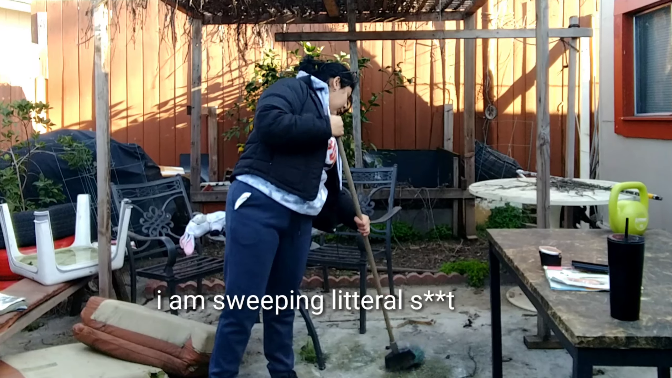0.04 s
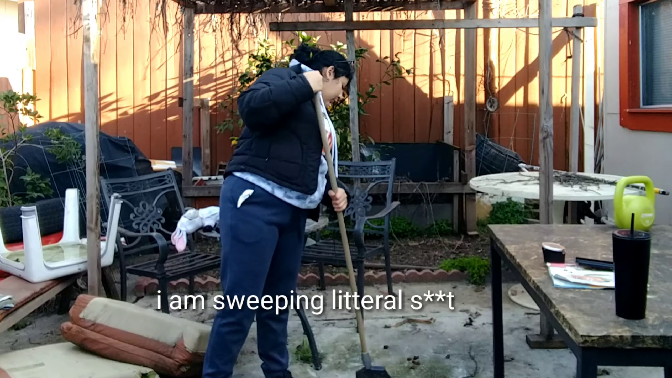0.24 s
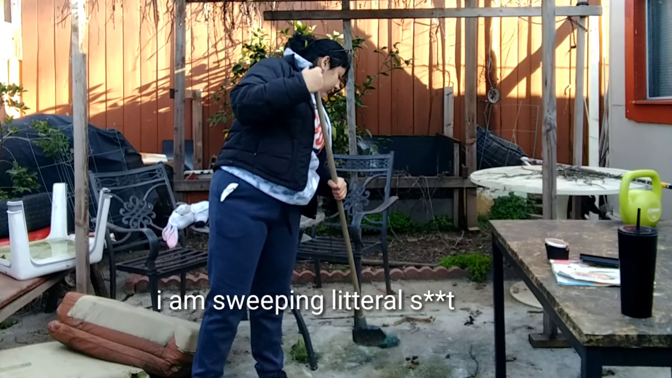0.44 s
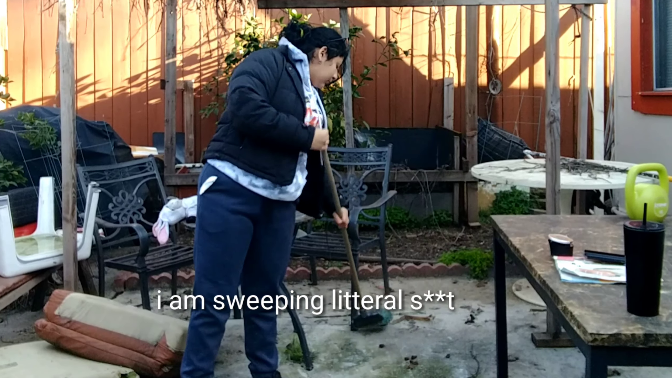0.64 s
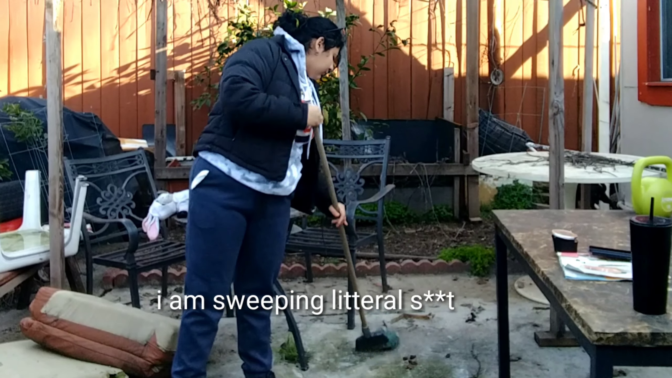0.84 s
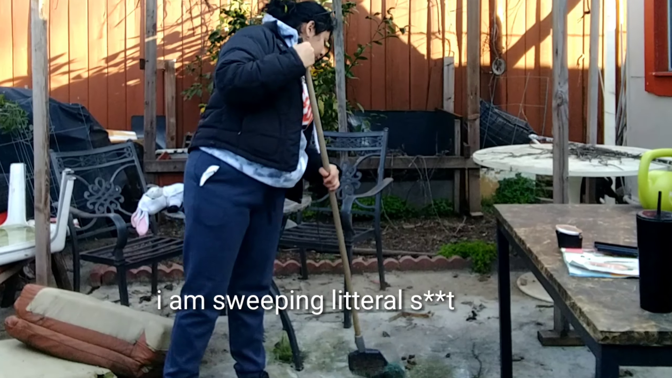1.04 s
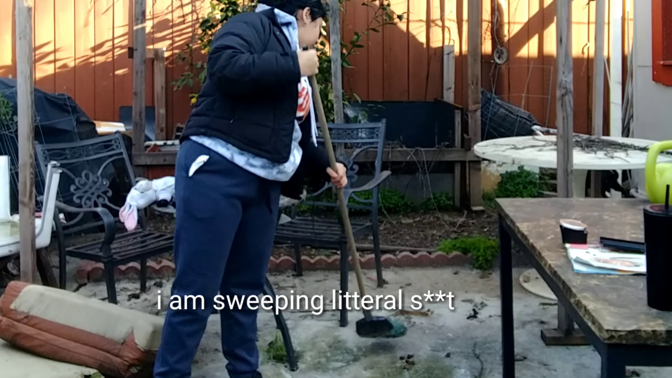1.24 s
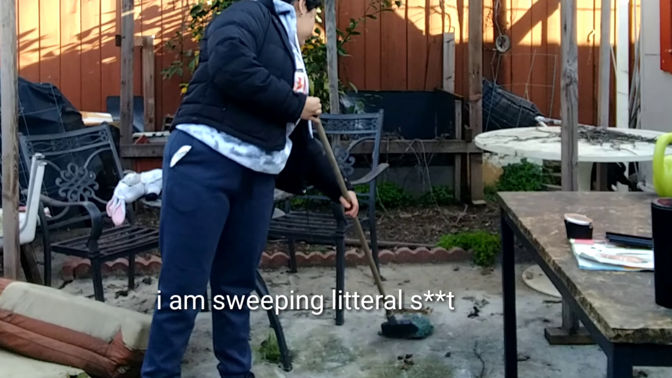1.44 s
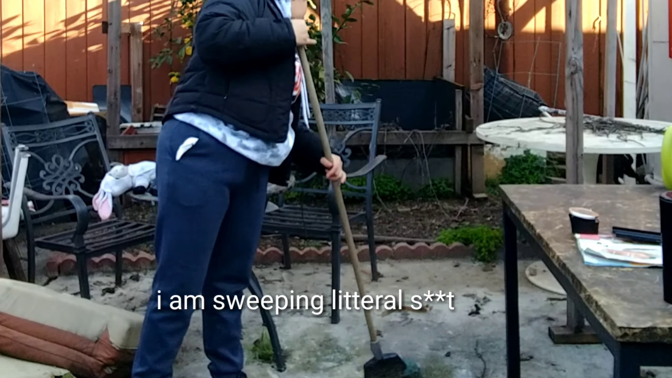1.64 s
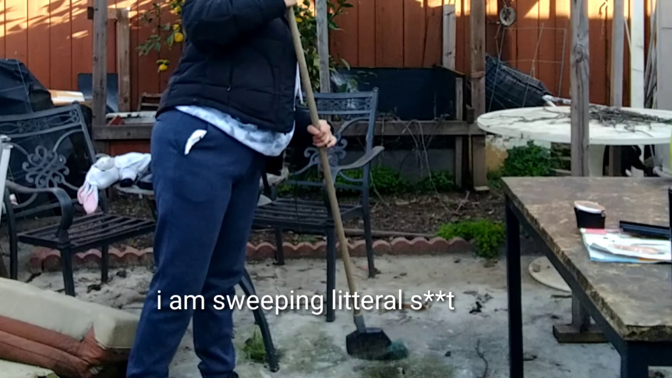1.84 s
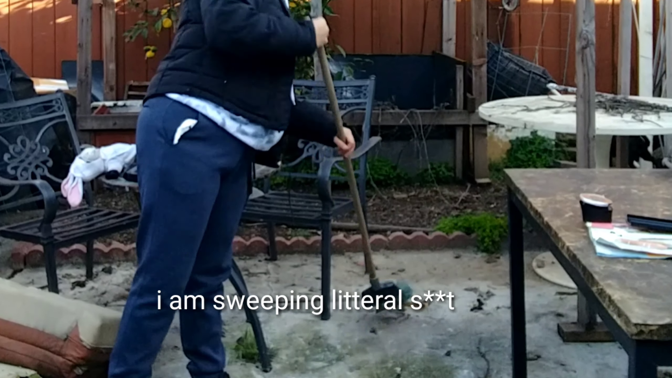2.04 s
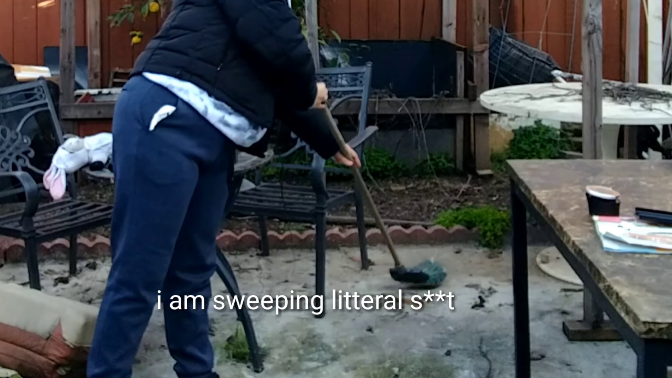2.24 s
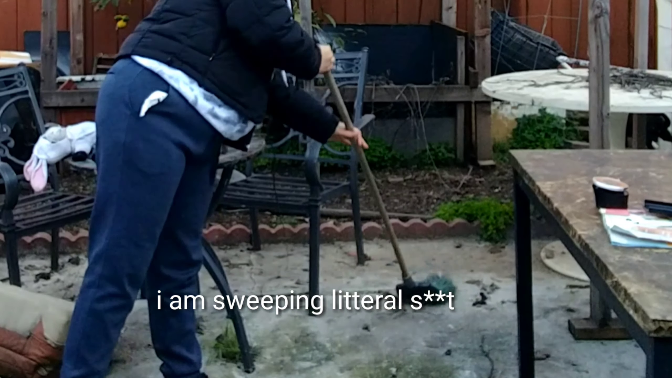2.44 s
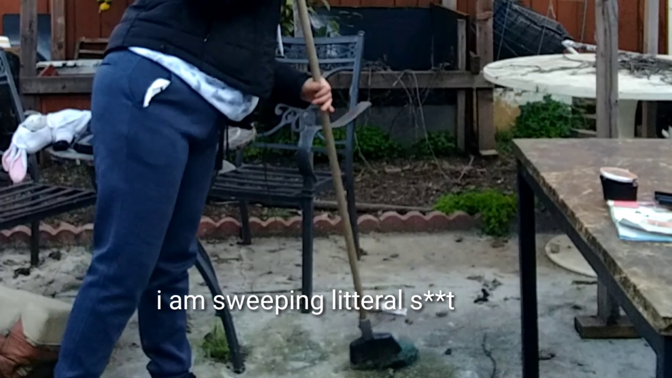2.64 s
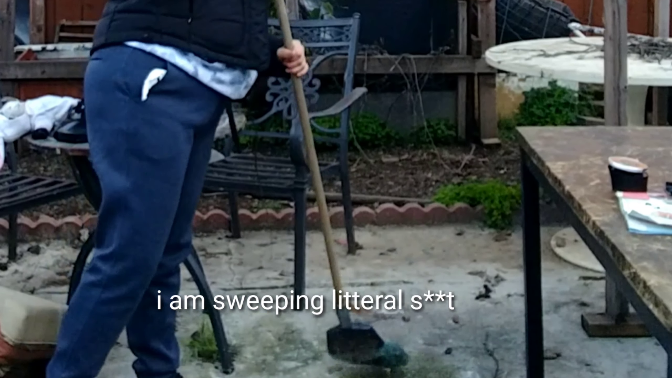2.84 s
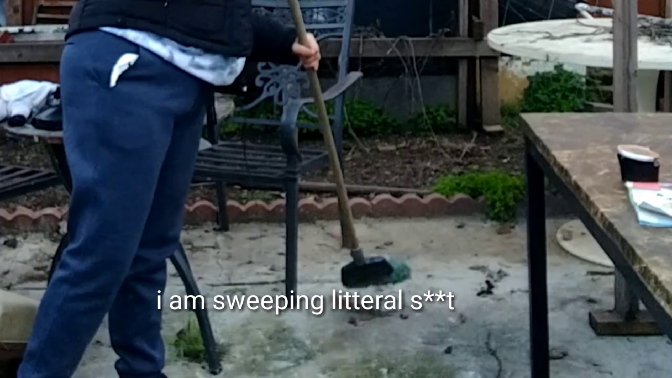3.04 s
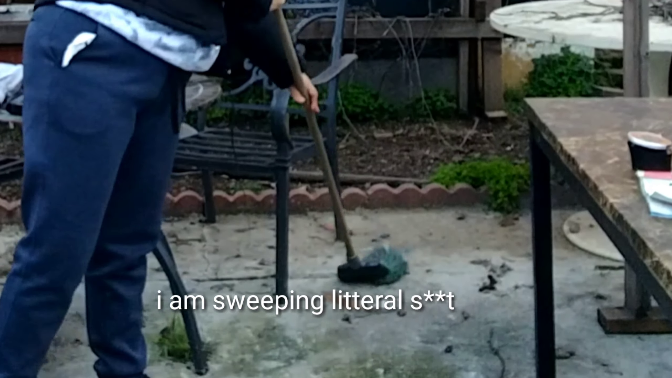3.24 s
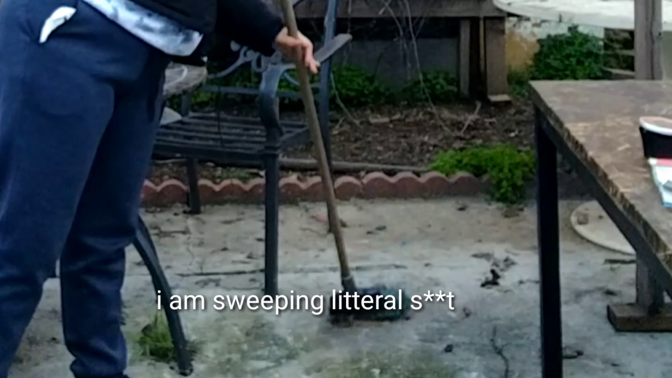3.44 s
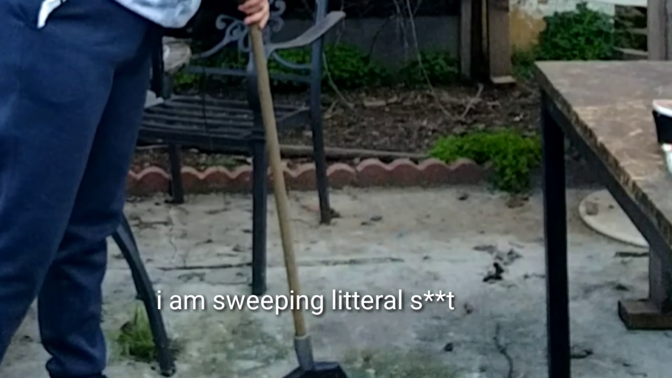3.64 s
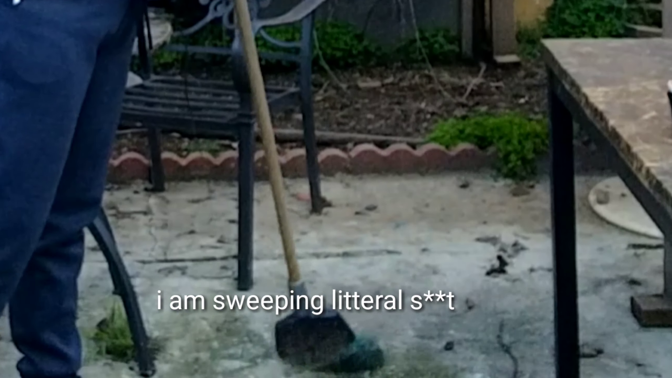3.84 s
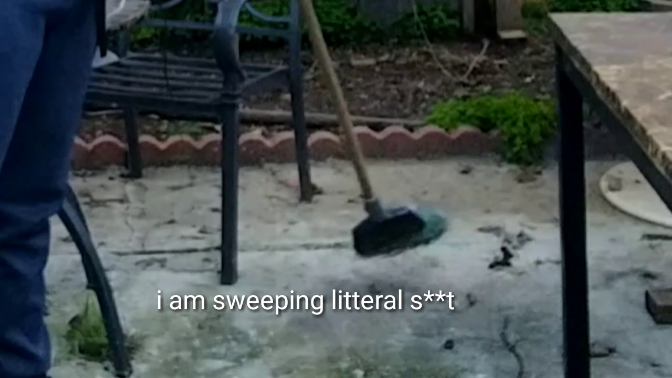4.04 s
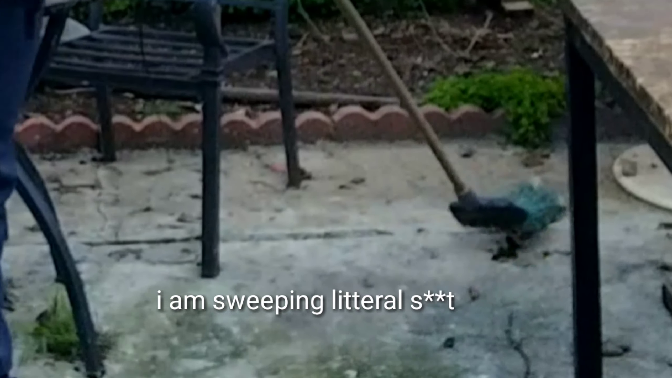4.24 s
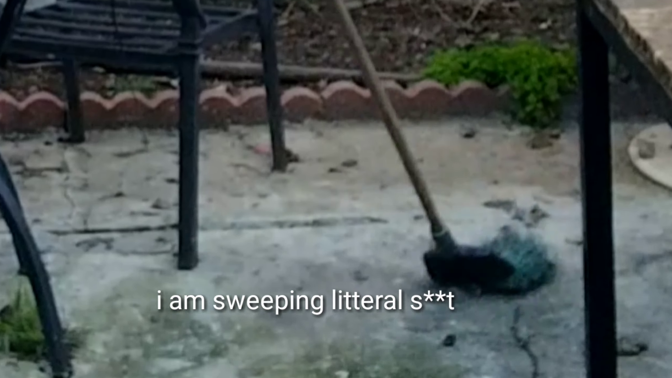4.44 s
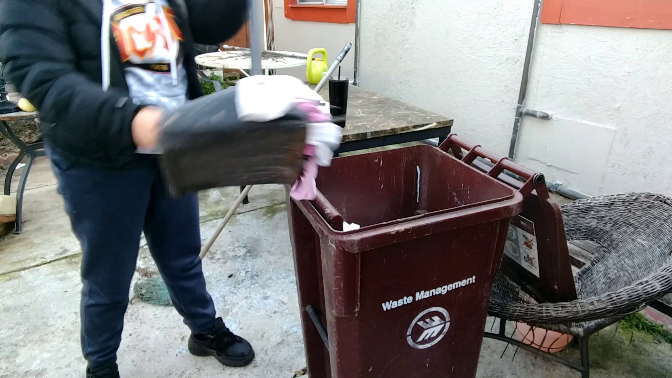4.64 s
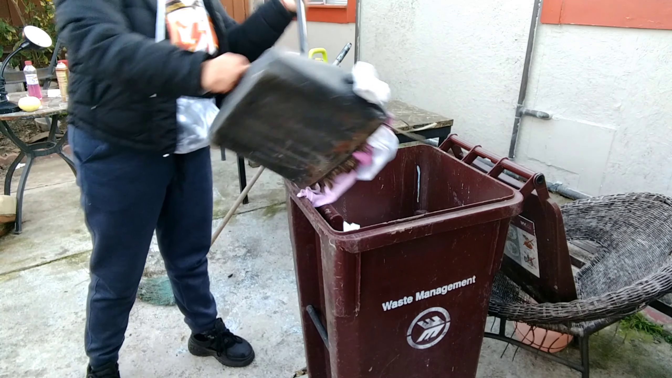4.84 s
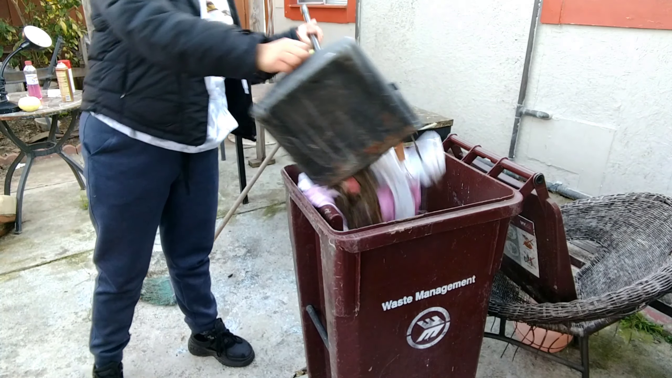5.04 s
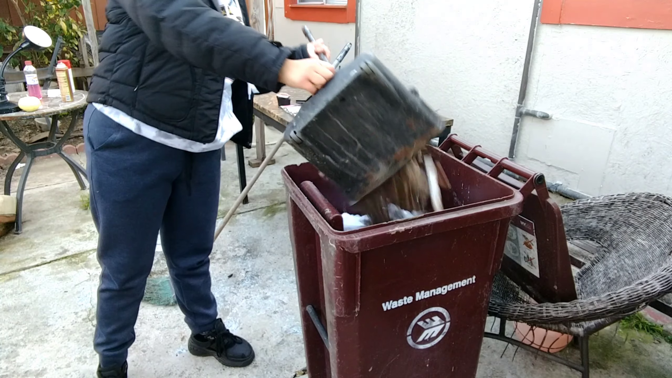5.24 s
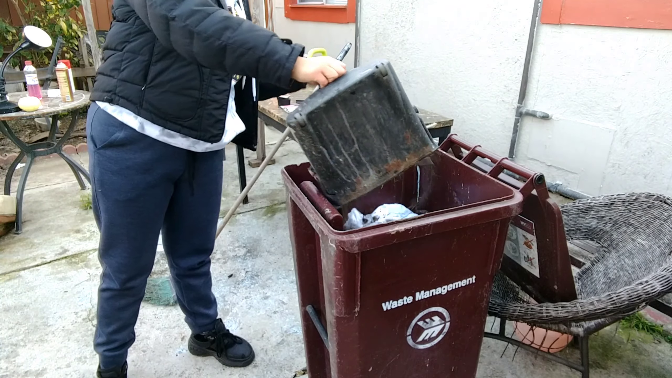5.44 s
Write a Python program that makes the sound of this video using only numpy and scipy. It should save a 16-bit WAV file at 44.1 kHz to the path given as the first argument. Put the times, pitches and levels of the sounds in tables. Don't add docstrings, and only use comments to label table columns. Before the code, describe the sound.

Dry, raspy bristle sweeps on gritty concrete outdoors with distant low rumble, then a sudden cut to rubbish sliding and clattering into a bin.

```python
import sys
import numpy as np
from scipy import signal
from scipy.fft import rfft, irfft, next_fast_len
from scipy.io import wavfile
from scipy.ndimage import uniform_filter1d

SR = 44100
rng = np.random.default_rng(int(sys.argv[2]) if len(sys.argv) > 2 else 0)


def how_loud(loudness_db):
    steps = np.asarray(loudness_db, float) / 20
    return 10 ** steps


def file_out(sig):
    cols = np.atleast_2d(sig).T
    lim = np.clip(cols, -1, 1)
    pcm = np.round(lim * 32767).astype(np.int16)
    wavfile.write(sys.argv[1], SR, pcm)


N = 242882
SIZE = next_fast_len(N + 4096)
HZ, T = np.fft.rfftfreq(SIZE, 1 / SR), np.arange(N) / SR
CUT_S, CUT_DIP_S, CUT_DIP_DB = 4.825, .016, -14

# [f/Hz, level/dB per Hz]
YARD = [(45, -6.5), (65, -4), (100, -4), (160, -7.5), (250, -12), (350, -19), (600, -25), (1000, -30),
        (1600, -65), (2300, -31.5), (3200, -49), (6000, -58), (9000, -51), (15000, -46.5)]
PATIO_DB, ALLEY_DB = -50.5, -52
WHINE_HZ, WHINE_DB = 6100, -71
# [t/s, shaft line level/dB, second line level/dB]
ENGINE = [(0.0, -60, -60), (0.44, -54, -55), (0.87, -80, -50.5), (1.11, -57, -75), (1.5, -62, -65.5),
          (1.96, -52, -47.5), (2.49, -42, -46.5), (2.75, -50.5, -51.5), (2.81, -42.5, -57.5),
          (3.17, -47, -46), (3.7, -41, -55), (3.88, -51, -48), (3.92, -43, -53), (4.02, -50, -46.5),
          (4.42, -43.5, -45), (4.52, -40.5, -48), (4.68, -59, -57), (4.8, -55, -63)]
# [t/s, f/Hz]
SHAFT = [(0, 76.8), (1.5, 75), (2.1, 80.47), (3.6, 81.7), (5.51, 81.6)]
# [t/s, level/dB]
EXHAUST = [(0, -50.5), (.9, -49), (1.06, -43), (1.64, -46.5), (1.75, -51), (2.58, -48), (2.66, -41),
           (2.9, -40.5), (3.05, -45), (3.3, -41.5), (3.5, -45.5), (4.0, -46), (4.08, -52.5), (4.53, -40),
           (4.66, -57), (4.78, -45.5), (4.85, -68), (5.5, -46.5)]
# [f/Hz, half width/Hz, level/dB]
PIPE = [(177.6, 12, 1.5), (199.5, 6.5, -2)]
# [t/s, peak level/dB]
THROBS = [
    (1.032, -31.5),
    (1.094, -37.5),
    (1.235, -28),
    (1.362, -37.5),
    (1.49, -35.5),
    (1.545, -35),
]
THROB_HZ, THROB_S = 196.3, 0.017
# [t/s, level/dB]
DRONE = [(2.6, -79), (3.0, -53.5), (3.3, -51), (3.9, -56), (4.1, -49), (4.3, -63), (4.6, -72), (4.8, -73)]
DRONE_HZ, DRONE_WIDTH_HZ = 265, 25
# [f/Hz, wander/Hz]
FAN = [(301.5, 2.44), (404.5, 0.45), (503, 1.15)]
# [t/s, level/dB of each of its three lines]
FAN_LEVEL = [(0.0, -86, -75, -88), (1.64, -75, -56, -60), (2.0, -61, -67, -67), (2.5, -62, -57.5, -59.5),
             (2.8, -62, -70, -73), (2.95, -63.5, -58, -57), (3.2, -53.5, -57.5, -60.5),
             (3.42, -56, -49.5, -63), (3.5, -48, -58, -58), (3.7, -62, -61, -58.5),
             (3.78, -56.5, -48, -61.5), (4.08, -63.5, -51.5, -58), (4.15, -60, -56.5, -68),
             (4.35, -55, -52, -52.5), (4.55, -58, -56.5, -55.5), (4.62, -73, -67, -61),
             (4.82, -75.5, -65, -73)]
# [t/s, f/Hz, level/dB]
RUN_DOWN = [(4.46, 497, -85), (4.52, 492, -55.5), (4.6, 465, -60.5), (4.75, 421, -55.5), (4.81, 410, -61)]

# [t/s, peak level/dB, length/s, brightness/dB per octave, main wall pitch f/Hz]
LUMPS = [(5.1137, -22, 0.018, 7, 431), (5.118, -24.5, 0.0056, 11, 460), (5.129, -24, 0.016, 1.5, 431),
         (5.141, -26.5, 0.01, -7.5, 408), (5.172, -28.5, 0.07, -5, 450), (5.2136, -13, 0.0012, -1, 430),
         (5.222, -26, 0.013, -4, 431), (5.246, -27, 0.016, -4, 448), (5.258, -25.5, 0.0047, -6, 446),
         (5.265, -19.5, 0.015, 3, 433), (5.311, -26, 0.011, 0, 428), (5.335, -18, 0.024, -1, 450),
         (5.343, -22.5, 0.0025, 6, 443), (5.355, -25.5, 0.0041, -4, 440), (5.37, -24, 0.0094, 7, 431),
         (5.387, -27, .006, 6, 435), (5.393, -32, 0.0096, 12, 504), (5.405, -19, 0.016, 1, 439),
         (5.422, -26.5, 0.014, 13, 431), (5.439, -23, 0.0078, -15, 431), (5.472, -24.5, 0.022, 12, 444)]
# [f/Hz, level/dB, t60/s]
BIN = [(229, -5.5, 0.077), (258, -11.5, 0.13), (431, 8.5, 0.058), (560, 1.5, 0.051), (672, -5, 0.064),
       (925, -2, 0.025), (1085, -9.5, 0.031), (1330, -8.5, 0.027)]
# [t/s, peak level/dB, f/Hz, t60/s]
THUDS = [(5.1177, -28, 428, 0.12), (5.128, -25.5, 700, 0.027), (5.136, -30.5, 953, 0.056),
         (5.165, -33, 706, .04), (5.2136, -19, 810, 0.019), (5.222, -30, 240, 0.088),
         (5.2464, -22.5, 438, .12), (5.264, -20, 439, 0.093), (5.313, -25.5, 447, .1),
         (5.333, -22, 440, .08), (5.342, -21, 451, 0.068), (5.34, -24, 1404, .03), (5.352, -31, 700, 0.07),
         (5.3565, -19.5, 276, .06), (5.372, -25, 960, 0.028), (5.393, -23, 810, 0.032),
         (5.402, -24.5, 1442, 0.06), (5.405, -24.5, 486, .05), (5.405, -23, 1000, .015),
         (5.43, -30, 794, .04), (5.476, -28, 972, .05)]
THUD_RISE_S = 0.0013
BIN_LAG, BIN_RIGHT_DB = 5, -1.5

SAND = [(0.425, -41), (0.503, -33), (2.022, -39), (2.5925, -16), (3.381, -32.5), (3.9743, -48),
        (4.009, -33), (4.396, -31.5), (5.146, -24.5)]
DUST = [(0.444, -44), (0.5467, -46), (1.8816, -57), (2.987, -43), (3.0044, -41), (3.1028, -39.5),
        (3.119, -40), (3.2, -51), (4.0582, -44)]
STEMS = [(0.791, -39.5), (1.1917, -44.5), (1.8637, -45.5), (1.908, -46), (2.022, -37.5), (2.1161, -51),
         (2.2545, -44.5), (2.4379, -53), (2.546, -31), (2.5564, -28.5), (2.566, -32), (2.577, -26),
         (2.598, -29), (3.518, -20.5), (3.557, -24), (3.7028, -21.5), (3.705, -27), (3.721, -38),
         (4.944, -34), (5.258, -23.5), (5.267, -19.5), (5.41, -19), (5.418, -21.5)]
CHIPS = [(2.6067, -18.5), (3.3358, -32), (3.4915, -42), (3.5014, -35), (3.534, -17.5), (3.546, -18),
         (3.8134, -29.5), (3.871, -28), (3.975, -35), (5.3501, -17.5), (5.4767, -17)]
PEBBLES = [
    (3.51, -23),
    (4.044, -39.5),
    (4.146, -32.5),
    (5.2135, -19.5),
]
SNAPS = [
    (0.42, -47.5),
    (4.143, -28.5),
    (4.162, -37),
]
# [centre f/Hz, width/Hz, t60/s]
KINDS = [
    (11100, 5000, 0.025),
    (13100, 2800, 0.098),
    (5660, 2100, 0.06),
    (5560, 4200, 0.023),
    (1780, 2700, 0.2),
    (1500, 5300, 0.0028),
]

# [t/s, peak level/dB, f/Hz]
KNOCKS = [
    (3.497, -40, 658),
    (4.54, -46.5, 672),
    (4.555, -40, 640),
    (4.56, -52, 596),
]
KNOCK_T60 = 0.21
# [arrival t/s, hold/s, pressure level/dB, rise/s, fall/s; rise and fall span SPAN_DB]
STROKES = [(0.097, 0.013, -44, 0.28, 0.48), (0.225, 0.023, -40.5, 0.23, 0.0856),
           (0.794, .03, -60.5, 0.021, 2.5), (0.927, 0.11, -41.5, 0.24, 0.1),
           (1.499, 0.012, -42, 0.062, 0.1), (1.659, 0.012, -37, 0.17, 0.26),
           (1.885, 0.0057, -58.5, 0.078, 0), (2.016, 0.0043, -61, 0.013, -1),
           (2.27, .01, -53.5, 0.46, 0.36), (2.459, 0.034, -47, 0.045, 0.52),
           (2.554, 0.023, -39.5, 0.081, 0.15), (2.6, 0.0083, -34.5, 0.031, 0.16),
           (2.702, .11, -42, 0.27, 0), (2.829, 0.01, -47, 0.28, 0.1), (3.242, 0.17, -53, 0.29, -1.5),
           (3.499, 0.012, -36, 0.041, 0.19), (3.539, 0.0032, -32, 0.062, 0.08),
           (3.596, .12, -37, 0.14, 0.25), (3.879, 0.0039, -47, 0.025, 0.27), (4.16, 0.19, -55.5, 0.2, 0),
           (4.402, 0.044, -48, 0.008, 0), (4.478, .03, -46, 0.09, -3.5), (4.561, 0.045, -37.5, 0.12, 0.2),
           (4.675, 0.055, -42.5, 0.17, -1.5)]
POUR = [
    (4.87, 0.17, -51, 0.19, .3),
    (5.09, 0.0062, -46, 0.07, 0.0065),
    (5.152, 0.021, -48, 0.069, .2),
    (5.226, 0.074, -37, 0.047, 0.9),
    (5.39, 0.018, -32.5, 0.46, 0.14),
    (5.474, 0.0038, -32.5, 0.015, 0.08),
]
REST_DB, SPAN_DB = -68.5, 23.5
SWEEP_END_S = 4.801
# [t/s, block level/dB, bristle ring level/dB, fizz level/dB; relative to the pressure]
GRIP = [(0.0, -1.5, -8.5, -2.5), (0.6, 2, -2.5, -3), (1.13, 0.5, -18, -6), (1.44, -1.5, -18.5, -4.5),
        (1.95, -0.5, -14, -5), (2.44, -1, -5.5, -4.5), (2.545, -8, -6, -7.5), (2.625, -1.5, -8, -2),
        (2.95, 1.5, -5.5, -6), (3.46, -3.5, -7.5, -2.5), (3.8, -2.5, -20, -8.5), (4.39, -1.5, -5, 3),
        (4.51, -4.5, -8.5, -3.5), (4.826, 10, -16, -9), (4.98, 8.5, -7, -10), (5.2, 3.5, -4.5, -2),
        (5.33, 6.5, -3.5, -5.5)]
GRIP_S = 0.067
USUAL_DB = -45
BLOCK_LEAN, RING_LEAN, FIZZ_LEAN, LITTER_LEAN = -0.026, 0.03, -0.1, -0.24
# [f/Hz, level/dB per Hz]
BROOM = [(350, -3), (600, -4), (1000, -2), (1600, -1), (2300, -6), (3200, -7), (4500, -4), (5600, 0),
         (6600, -3), (8000, -5), (9000, -6), (10500, -4), (13000, -8), (15300, -13)]
# [f/Hz, level/dB per Hz]
LITTER = [(350, -3), (600, -1), (1000, -4), (1600, -8.5), (2300, -4), (3200, 12.5), (4500, -9.5),
          (5600, -6), (6600, -8), (8000, -9.5), (9000, -14), (10500, -11), (13000, -16), (15300, -24)]
ZONES_HZ = [2100, 4800, 6400, 8800]
# [f/Hz, width/Hz, level/dB]
HEAD_RING = (1600, 2.6, 0.68)
PATCH_DB = 1.5

# [f/Hz, share from 0 to 1]
SAME = [(60, 0.95), (190, 0.95), (250, 0.79), (600, 0.77), (1200, 0.068), (2000, 0.1), (16000, 0.15)]
# [f/Hz, level/dB]
NEAR_TILT = [(60, 25), (1500, 2.5), (4500, -0.5), (5600, 14), (8000, 4), (10500, 8), (15000, 10)]
# [f/Hz, level/dB]
FAR_TILT = [(60, -0.5), (600, 3), (3000, -10), (6000, -8), (9000, -33.5), (12000, 0), (15000, 10)]
PORT_LAG_S = .0001
# [f/Hz, share from 0 to 1]
CROSS = [(60, .9), (2000, .86), (2250, .8), (2500, .62), (3300, .93), (4500, .93), (5500, .52), (6600, .58),
         (7700, .3), (8800, .2), (10500, 0)]
CROSS_LAG = 20
CROSSING = np.clip(np.interp(HZ, *np.transpose(CROSS)), 0, 1) * np.exp(-2j * np.pi * HZ * CROSS_LAG / SR)

BANDS = [0, 8, 16, 24, 32, 40, 48, 56, 64, 72, 80, 88, 96, 108, 120, 132, 144, 160, 176, 196, 216, 240, 264, 292, 320] + list(range(352, 1025, 32))
# [f/Hz, level/dB of the stronger channel over the step]
COARSE = [(200, 24), (600, 16), (1000, 8), (1500, 4), (2000, 2), (3000, 1.5), (9000, 1), (15000, 2)]
CLICK_FINE_DB = 10
CLICK_S, CLICK_KEEP_DB = .014, -30
WEAK_DB, WEAK_SIDE_DB, WEAK_SWING_DB, QUIET_LEAN = -8.7, -12.5, 1.7, .15
FRAME_SWING_DB = 1.2
TOP_HZ, TOP_JITTER_HZ, TOP_OPEN_HZ = 15380, 120, 350


def evened(x):
    return x / np.sqrt(np.mean(x ** 2) + 1e-20)


def read(points, hz=HZ):
    f, value = np.transpose(points)
    return np.interp(np.log(hz + 1), np.log(f + 1), value)


def curves(rows):
    s, *columns = np.transpose(rows)
    return [np.interp(T, s, c) for c in columns]


def coloured(x, gain):
    return irfft(rfft(x, SIZE) * gain, SIZE)[..., :N]


def resonate(x, hz, width):
    turn = np.exp(2j * np.pi * np.cumsum(hz * np.ones(len(x))) / SR)
    r = np.exp(-np.pi * width / SR)
    return 2 * (turn * signal.lfilter([1 - r], [1, -r], x / turn)).real


def at_ports(pair, tilt, gain=1, band_hz=None):
    a, b = rfft(pair, SIZE) * gain
    same, half = np.clip(read(SAME), 0, 1), how_loud(read(tilt) / 2)
    late = np.exp(-2j * np.pi * HZ * PORT_LAG_S)
    right = same * a * late + np.sqrt(1 - same ** 2) * b
    ports = np.array([a * half, right / half])
    if band_hz:
        inside = (HZ > band_hz[0]) & (HZ < band_hz[1])
        band = (ports.mean(0) * (1 - CROSSING))[inside]
        ports /= np.sqrt(2 * np.sum(abs(band) ** 2) / (SIZE * N))
    return irfft(ports, SIZE)[:, :N]


def far(x, band_hz=None):
    return at_ports([x, np.roll(x, 300)], FAR_TILT, 1, band_hz)


def yard():
    s = np.arange(600) / 100
    waves = [np.sin(2 * np.pi * (f * s + rng.random())) / np.sqrt(f) for f in np.geomspace(.3, 8, 16)]
    swell = np.interp(T, s, evened(sum(waves)))
    wash = at_ports(rng.standard_normal((2, N)), FAR_TILT, how_loud(read(YARD)), (240, 700))
    wash_db = np.where(T < CUT_S, PATIO_DB, ALLEY_DB) + 0.5 * swell
    narrow = 1 / (1 + ((HZ - WHINE_HZ) / 45) ** 2)
    whine = evened(coloured(rng.standard_normal((2, N)), narrow))
    return wash * how_loud(wash_db) + how_loud(WHINE_DB) * whine * (T < CUT_S)


def line(f, wander_hz, beat_db=2.5):
    drift, beat = (np.interp(T, np.arange(120) / 20, rng.standard_normal(120)) for _ in range(2))
    cycles = np.cumsum(f + wander_hz * drift) / SR + rng.random()
    return how_loud(beat_db * beat) * np.sin(2 * np.pi * cycles)


def engine():
    shaft_db, second_db = curves(ENGINE)
    hz, = curves(SHAFT)
    out = far(line(hz, 2.73), (65, 92)) * how_loud(shaft_db)
    out += far(line(1.61 * hz, 2.06), (112, 140)) * how_loud(second_db)
    return out * (T < CUT_S)


def exhaust():
    boom_db, = curves(EXHAUST)
    pipe = sum(how_loud(db) / (1 + ((HZ - f) / width) ** 2) for f, width, db in PIPE)
    boom = at_ports(rng.standard_normal((2, N)), FAR_TILT, pipe, (160, 225)) * how_loud(boom_db - 0.5)
    thumps = np.zeros(N)
    for s, db in THROBS:
        swell = np.exp(-((T - s) / THROB_S) ** 2)
        thumps += how_loud(db) * swell * np.sin(2 * np.pi * THROB_HZ * (T - s))
    return boom + far(thumps)


def fan():
    slow_hz, slow_db = curves(RUN_DOWN)
    out = far(line(slow_hz, 1.0, beat_db=0.0)) * how_loud(slow_db)
    for (f, wander_hz), db in zip(FAN, curves(FAN_LEVEL)):
        out += far(line(f, wander_hz, beat_db=2.4), (f - 12, f + 12)) * how_loud(db)
    return out * (T < CUT_S)


def drone():
    narrow = 1 / (1 + ((HZ - DRONE_HZ) / DRONE_WIDTH_HZ) ** 2)
    noise = at_ports(rng.standard_normal((2, N)), FAR_TILT, narrow, (230, 300))
    return noise * how_loud(curves(DRONE)[0]) * (T < CUT_S)


def lumps():
    out, t = np.zeros(N + SR), np.arange(5000) / SR
    for s, db, length, bright_db, wall_hz in LUMPS:
        blow = rng.standard_normal(len(t)) * np.exp(-(t / length) ** 4) + 8.9 * (t == 0)
        blow = uniform_filter1d(np.pad(blow, (8, 0)), size=14)[:len(t)]
        tilt_db = np.clip(bright_db, -18, 6)
        ring = np.zeros(len(t))
        for hz, mode_db, t60 in BIN:
            level = how_loud(mode_db + tilt_db * np.log2(hz / 441)) * np.sqrt(t60)
            ring += level * resonate(blow, hz * wall_hz / 431, 1.8 / t60)
        ring = ring * np.exp(-(t / (length + .009)) ** 3)
        out[round(s * SR):][:len(t)] += how_loud(db - 4.0) * ring / abs(ring).max()
    for s, db, hz, t60 in THUDS:
        rise = 1 - np.exp(-t / THUD_RISE_S)
        out[round(s * SR):][:len(t)] += how_loud(db - 60 * t / t60) * np.sin(2 * np.pi * hz * t) * rise
    return np.array([out[:N], how_loud(BIN_RIGHT_DB) * np.roll(out, BIN_LAG)[:N]])


def grit():
    out, t = np.zeros((2, N + SR)), np.arange(2500) / SR
    tables = (SAND, DUST, STEMS, CHIPS, PEBBLES, SNAPS)
    flicks = [row + kind for rows, kind in zip(tables, KINDS) for row in rows]
    for s, db, hz, width, t60 in flicks:
        fade = (how_loud(-60 * t / 0.0091) + .6 * how_loud(-60 * t / t60)) * np.minimum(t / .0004, 1)
        tick = 4.0 * (t == t[20])
        burst = rng.standard_normal((2, len(t))) * fade + tick
        burst = np.array([resonate(resonate(b, hz, width), hz, width) for b in burst])
        out[:, round(s * SR):][:, :len(t)] += how_loud(db) * burst / abs(burst).max()
    return at_ports(out[:, :N], NEAR_TILT)


def knocks():
    out = np.zeros(N)
    for s, db, hz in KNOCKS:
        fade = how_loud(db - 60 * np.clip(T - s, 0, 1) / KNOCK_T60)
        out += fade * np.sin(2 * np.pi * hz * (T - s)) * (T > s)
    return out * np.ones((2, 1))


def pressure():
    s, hold, db, rise, fall = np.transpose(STROKES + POUR)[..., None]
    t = T[::64]
    before = np.maximum((s - t) / abs(rise), 0)
    after = np.maximum((t - s - abs(hold)) / abs(fall), 0)
    same_scene = (s < SWEEP_END_S) == (t < SWEEP_END_S)
    power = (how_loud(db - SPAN_DB * (before + after)) ** 2 * same_scene).sum(0) + how_loud(REST_DB) ** 2
    return np.interp(T, t, 10 * np.log10(power))


def controls():
    level_db = pressure()
    s, *grip = np.transpose(GRIP)
    held = np.array(grip)[:, np.maximum(np.searchsorted(s, T) - 1, 0)]
    head, ring, fizz = uniform_filter1d(held, round(GRIP_S * SR), axis=1)
    over = level_db - USUAL_DB
    head = head + np.where(T < CUT_S, BLOCK_LEAN, LITTER_LEAN) * over
    return level_db, head, ring + RING_LEAN * over, fizz + FIZZ_LEAN * over


def slips(per_s, spread_db, t60):
    happens = rng.random(N) < per_s / SR
    size = how_loud(spread_db * np.minimum(rng.exponential(1, N), 4)) ** 2 * happens
    power = signal.lfilter([1], [1, -how_loud(-120 / (t60 * SR))], size)
    return power / power.mean()


def scrape(per_s, spread_db, t60, smooth):
    level_db, head_db, ring_db, fizz_db = controls()
    shared = slips(per_s=per_s, spread_db=spread_db, t60=t60)
    step = [1 / (1 + (edge / (HZ + 1)) ** 16) for edge in ZONES_HZ]
    shares = -np.diff([HZ ** 0] + step + [HZ * 0], axis=0)
    head, below, ring, above, fizz = np.sqrt(np.clip(shares, 0, 1))
    block = 1 + how_loud(HEAD_RING[2]) / (1 + (2 * (HZ - HEAD_RING[0]) / HEAD_RING[1]) ** 2)
    broom, litter = how_loud(read(BROOM)), how_loud(read(LITTER))

    def zone(gain, band_hz, db, sparse=1):
        own = slips(per_s=per_s / sparse, spread_db=spread_db, t60=t60 / np.sqrt(sparse))
        power = smooth + (1 - smooth) * (shared + own) / 2
        noise = rng.standard_normal((2, N)) * np.sqrt(abs(power))
        return at_ports(noise, NEAR_TILT, gain, band_hz) * how_loud(level_db + db)

    broom_head = broom * head * block / np.sqrt(1 + (650 / (HZ + 1)) ** 8)
    litter_head = litter * head / np.sqrt(1 + (230 / (HZ + 1)) ** 8)
    below = below / np.sqrt(1 + (2250 / (HZ + 1)) ** 6)
    out = zone(broom_head, (700, 1900), head_db) * (T < CUT_S)
    out += zone(litter_head, (250, 1900), head_db - 4.5) * (T >= CUT_S)
    out += zone(broom * below, (2500, 15000), -4.5)
    out += zone(broom * above, (2500, 15000), -5.5)
    out += zone(broom * ring, (5000, 6200), ring_db, sparse=8.2)
    return out + zone(broom * fizz, (9000, 15000), fizz_db, sparse=2.6)


def patchy(x):
    z = signal.stft(x, nperseg=256, noverlap=128)[2]
    patches = uniform_filter1d(rng.standard_normal(z.shape[1:]), size=3, axis=0)
    patches = evened(uniform_filter1d(patches, size=5, axis=1))
    z = z * how_loud(PATCH_DB * patches - PATCH_DB ** 2 / 2.5)
    return signal.istft(z, nperseg=256, noverlap=128)[1][:, :N]


def scene():
    dip = how_loud(CUT_DIP_DB * np.exp(-((T - CUT_S) / CUT_DIP_S) ** 2))
    background = yard() + engine() + exhaust() + fan() + drone()
    sweeping = patchy(scrape(per_s=360, spread_db=3.5, t60=0.018, smooth=0.81))
    return background * dip + lumps() + grit() + knocks() + sweeping


def widened(ports):
    return ports - coloured(ports[::-1], CROSSING)


def starved(pair, weak_db, lo_hz, edges):
    power = np.add.reduceat(abs(pair) ** 2, edges, axis=1)
    strong = power > power[::-1] * how_loud(2 * weak_db)
    keep = np.repeat(strong, np.diff(np.append(edges, pair.shape[1])), 1)
    keep[:, :int(lo_hz * 2048 / SR)] = True
    return pair * keep


def rounded(pair, fine_db):
    width = np.diff(np.append(BANDS[:-1], 1024))[:, None]
    power = np.add.reduceat(pair ** 2, BANDS[:-1], axis=1).max(0)
    rms = np.sqrt(power / width + 1e-24)
    step = np.repeat(rms, width[:, 0], axis=0) / how_loud(fine_db)
    return np.sign(pair) * step * np.floor(abs(pair / step) ** .75 + .4054) ** (4 / 3)


def thinned(wide):
    lead, count = 1503, N // 1024 + 3
    n, k = np.arange(2048)[:, None], np.arange(1024) + .5
    window = signal.windows.kaiser_bessel_derived(2048, 4 * np.pi)[:, None]
    lapped = np.cos(np.pi / 1024 * (n + 512.5) * k) * window
    halves = np.pad(wide, ((0, 0), (lead, (count + 1) * 1024 - N - lead))).reshape(2, -1, 1024)
    z = (np.concatenate([halves[:, :-1], halves[:, 1:]], axis=2) @ lapped).transpose(0, 2, 1)
    hz, s = k * SR / 2048, ((np.arange(count) + 1) * 1024 - lead) / SR

    treble = uniform_filter1d(np.diff(wide[0], 2) ** 2, 128)
    level_db = 10 * np.log10(np.interp(s, T[2:], abs(uniform_filter1d(treble, 2048))) + 1e-12)
    sharp_s = np.array(SAND + CHIPS + PEBBLES + SNAPS + STEMS[:2])[:, :1]
    click = (abs(s - sharp_s) < CLICK_S).any(0)
    band_swing = evened(uniform_filter1d(rng.standard_normal((len(BANDS) - 1, len(s))), 2))
    frame_swing = evened(uniform_filter1d(rng.standard_normal(len(s)), size=4))
    swing_db = WEAK_SWING_DB * band_swing + FRAME_SWING_DB * frame_swing + CLICK_KEEP_DB * click
    swing_db = swing_db - QUIET_LEAN * (level_db - np.median(level_db))

    z = starved(z, WEAK_SIDE_DB, 9000, edges=np.arange(0, 1024, 8))
    pair = np.array([z[0] + z[1], z[0] - z[1]]) / 2
    pair = starved(pair, WEAK_DB + swing_db, 1640, edges=BANDS[:-1])
    mid, side = rounded(pair, read(COARSE, hz)[:, None] + CLICK_FINE_DB * click)
    top_hz = TOP_HZ + TOP_JITTER_HZ * rng.standard_normal(len(s)) + TOP_OPEN_HZ * click
    z = np.array([mid + side, mid - side]) * (hz[:, None] < top_hz)

    back = z.transpose(0, 2, 1) @ lapped.T / 512
    out = (back[:, 1:, :1024] + back[:, :-1, 1024:]).reshape(2, -1)
    return out[:, lead - 1024:lead - 1024 + N]


def top_cut(x):
    return signal.sosfilt(signal.butter(12, 16490, fs=SR, output="sos"), x)


def record(dry):
    bass_cut = 1 / np.sqrt(1 + (58 / (HZ + 1)) ** 8)
    mix = thinned(coloured(widened(dry), bass_cut))
    return top_cut(mix)


dry = scene()
out = record(dry)
file_out(out)
```